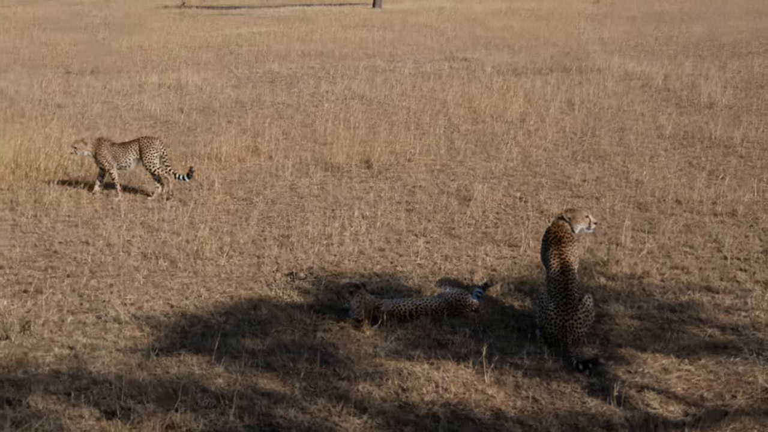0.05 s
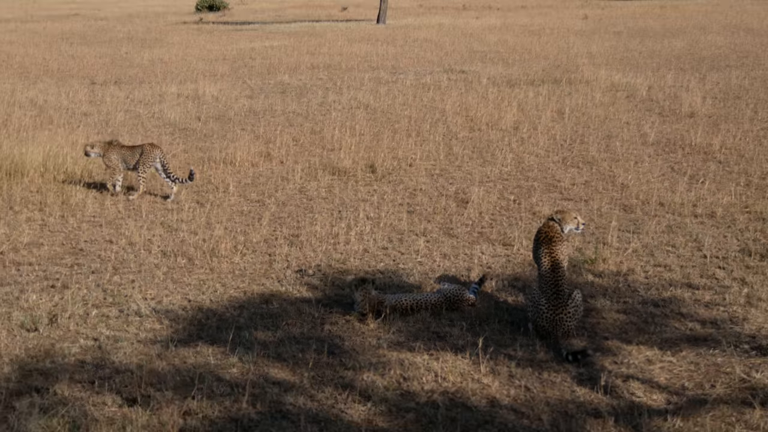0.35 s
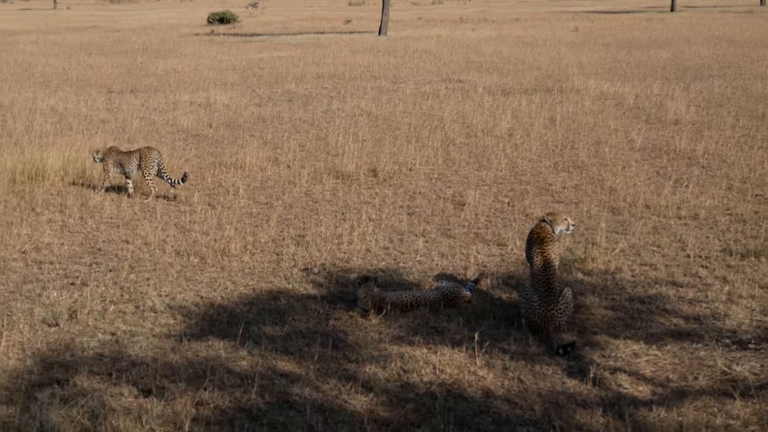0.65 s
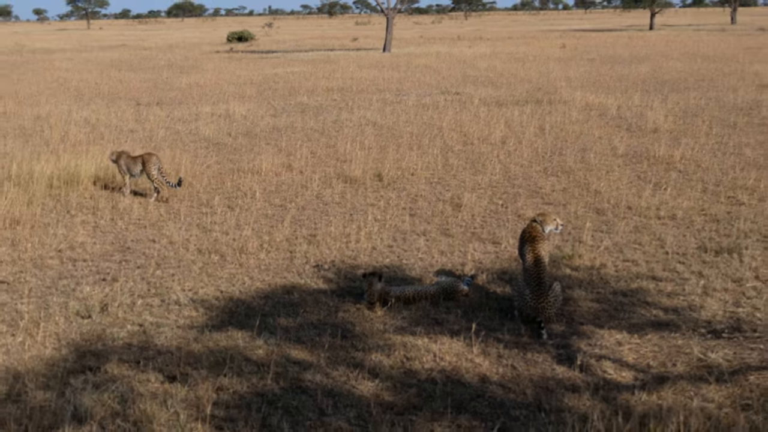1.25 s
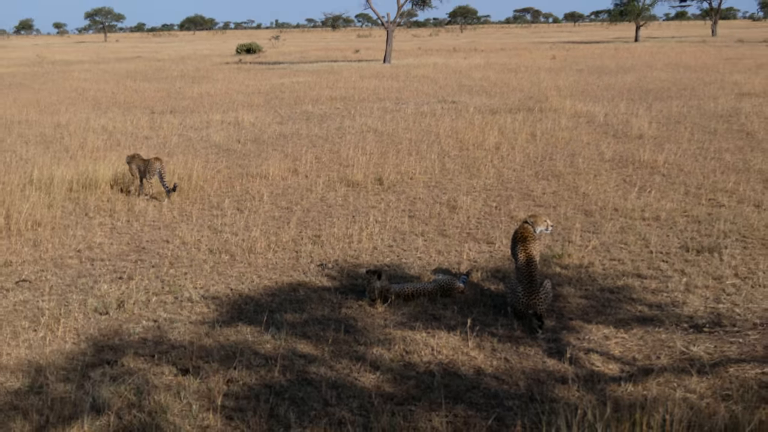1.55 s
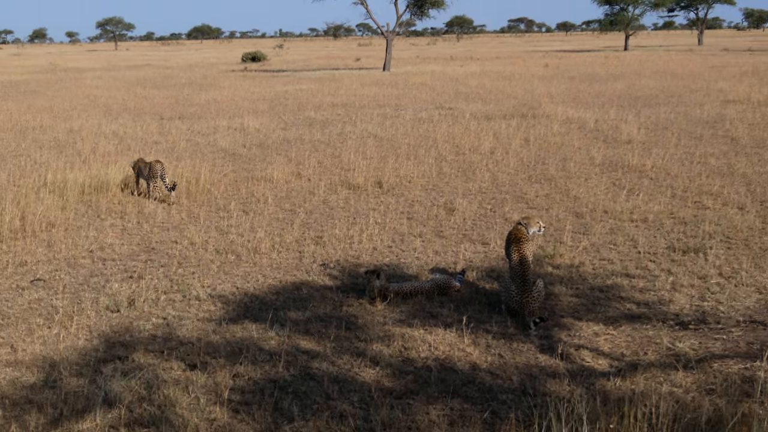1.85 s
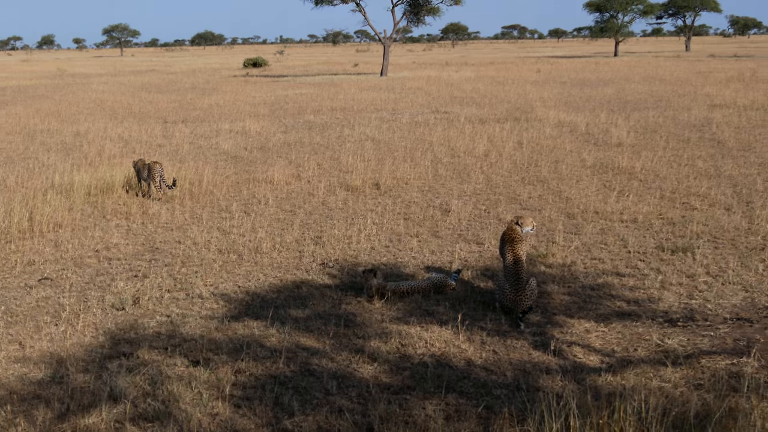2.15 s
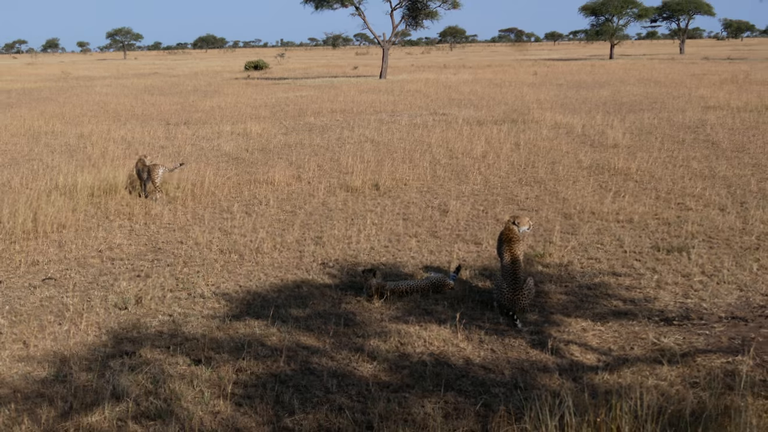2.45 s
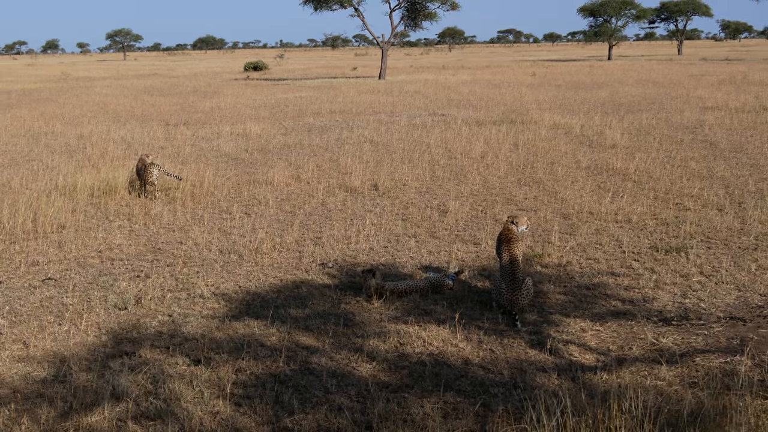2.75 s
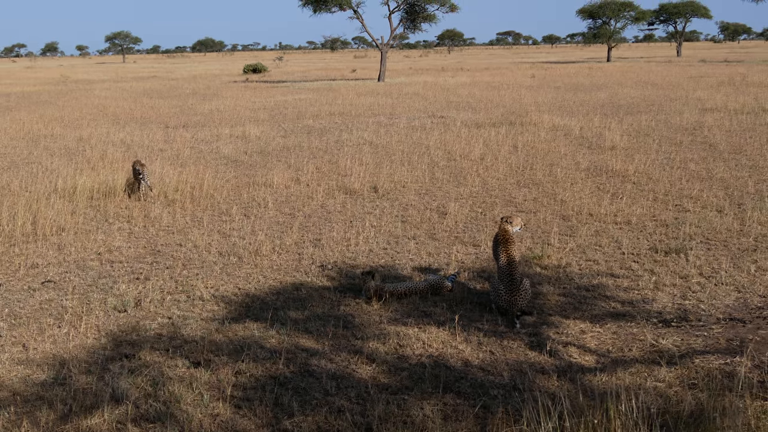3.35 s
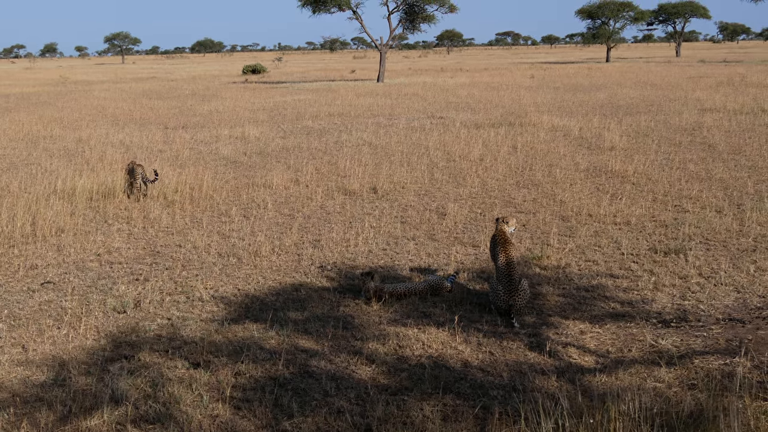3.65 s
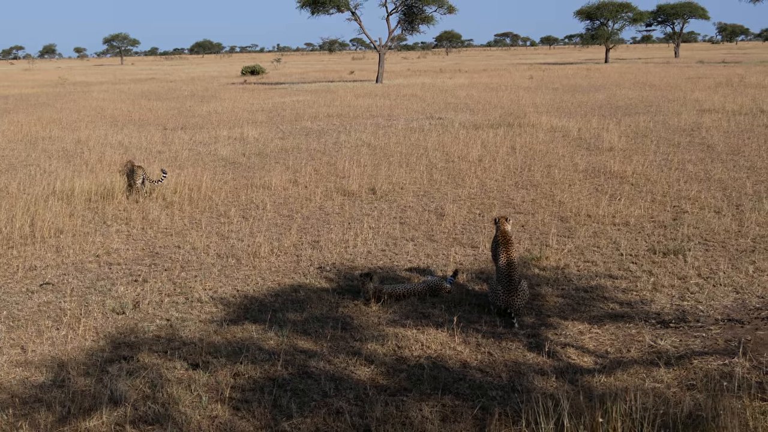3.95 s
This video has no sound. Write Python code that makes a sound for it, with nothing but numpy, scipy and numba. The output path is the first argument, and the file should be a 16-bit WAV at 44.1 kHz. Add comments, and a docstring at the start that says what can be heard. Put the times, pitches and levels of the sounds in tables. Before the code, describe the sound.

Uneven gusts of wind rumble and thump right on the microphone throughout, on an open plain. Behind them dry grass hisses very softly, and far-off birds give a few faint whistles and chips, mostly toward the end.

```python
"""Gusts buffet a stereo microphone on open grassland: eddies thump at its two ports, brighter when
they push harder, and the hardest scrape on the port mesh. Behind them the breeze rushes over the plain,
hisses in dry stalks and sizzles in the seed heads; this background swells slowly, with brief dips
written in where the recorder's gain ducks after the loudest thumps. There are a few faint ticks.
Far off, small birds whistle and chip, their calls scattered by grass and trees."""
import sys
import numpy as np
from scipy import signal
from scipy.fft import rfft, irfft
from scipy.io import wavfile
from scipy.ndimage import uniform_filter1d
from numba import njit

SR = 44100
rng = np.random.default_rng(int(sys.argv[2]) if len(sys.argv) > 2 else 0)


def bounce(signal):
    """Save signal as a 16-bit WAV file at the path given by the first command-line argument."""
    frames = np.transpose(np.atleast_2d(signal))
    limited = np.clip(frames, -1, 1)
    pcm = np.round(limited * 32767).astype(np.int16)
    wavfile.write(sys.argv[1], SR, pcm)


N = 176400
TIME = np.arange(N) / SR


def undb(db):
    """Decibels to gain."""
    return 10 ** (np.asarray(db) / 20)


def unit_rms(x):
    """Scale to rms 1."""
    return x / np.sqrt(np.mean(x ** 2))


def over_time(rows):
    """Join (seconds, value) rows by straight lines."""
    return np.interp(TIME, *np.array(rows).T)


def over_frequency(rows, column=1):
    """One column of a (Hz, ..) table at every frequency bin."""
    rows, bin_hz = np.array(rows), np.arange(N // 2 + 1) * SR / N
    return np.interp(np.log(bin_hz + 1), np.log(rows[:, 0]), rows[:, column])


def butter(x, hz, kind, order=2):
    """Plain low-, high- or band-pass."""
    return signal.sosfilt(signal.butter(order, np.minimum(hz, .45 * SR), kind, fs=SR, output="sos"), x)


def wander(per_s):
    """Smooth random motion with rms 1."""
    return unit_rms(butter(rng.standard_normal(N), per_s / 2, "low"))


@njit
def moving_lowpass(x, edge_hz, damping):
    """State-variable low-pass with a moving edge."""
    low, band_state, low_state = np.empty(len(x)), 0., 0.
    for i in range(len(x)):
        g = np.tan(np.pi * edge_hz[i] / SR)
        band = (band_state + g * (x[i] - low_state)) / (1 + g * (g + damping))
        low[i] = low_state + g * band
        band_state, low_state = 2 * band - band_state, 2 * low[i] - low_state
    return low


def stereo_hiss(spectrum, width):
    """Coloured stereo noise; width is side against mid, and the bass stays central."""
    gain = undb(over_frequency(spectrum))
    mid, side = (unit_rms(irfft(rfft(rng.standard_normal(N)) * gain, N)) for _ in range(2))
    side = butter(side, 250, "high")
    return mid + width * np.array([side, -side])


# Wind pressure right at the microphone. Each row: time in seconds, relative level in dB.
GUST_LEVEL = [(0.0, -45.5), (0.12, -40), (0.145, -53.5), (0.17, -35), (0.182, -45), (0.2, -26.5),
              (0.232, -47.5), (0.25, -33.5), (0.36, -32), (0.405, -36), (0.425, -52), (0.48, -62.5),
              (0.495, -55.5), (0.505, -33.5), (0.525, -51), (0.6, -55), (0.63, -42.5), (0.665, -46),
              (0.69, -29), (0.735, -21), (0.748, -29.5), (0.758, -48.5), (0.78, -35.5), (0.92, -30.5),
              (0.99, -34.5), (1.012, -20), (1.055, -22), (1.072, -33.5), (1.09, -24), (1.14, -30.5),
              (1.16, -35), (1.23, -42), (1.27, -27.5), (1.32, -36.5), (1.4, -37), (1.44, -55.5),
              (1.46, -38.5), (1.478, -45.5), (1.5, -28), (1.52, -42.5), (1.535, -29.5), (1.57, -50),
              (1.63, -38.5), (1.675, -31.5), (1.7, -54), (1.73, -32), (1.77, -26.5), (1.86, -25),
              (1.92, -23), (1.945, -33.5), (2.06, -28), (2.095, -36.5), (2.14, -28.5), (2.22, -22.5),
              (2.275, -34.5), (2.34, -24), (2.355, -48), (2.372, -46), (2.405, -36), (2.425, -40),
              (2.45, -26), (2.51, -28.5), (2.57, -22.5), (2.6, -50), (2.63, -30.5), (2.662, -38.5),
              (2.686, -28), (2.705, -33), (2.73, -31.5), (2.75, -48), (2.79, -47.5), (2.88, -34.5),
              (2.9, -49.5), (2.935, -41.5), (2.96, -26.5), (3.0, -27.5), (3.015, -52), (3.04, -45.5),
              (3.09, -36), (3.105, -28.5), (3.21, -28.5), (3.24, -38), (3.275, -29.5), (3.3, -36),
              (3.36, -38.5), (3.41, -45.5), (3.43, -28.5), (3.46, -50), (3.565, -38), (3.585, -33.5),
              (3.62, -35.5), (3.68, -37), (3.715, -25.5), (3.745, -36.5), (3.82, -20), (3.85, -38),
              (3.93, -37), (4.0, -32)]
# Top of the rumble for a gust at STRONG_GUST_DB. Each row: time in seconds, upper edge in Hz.
RUMBLE_EDGE = [(0, 378), (.35, 396), (.73, 539), (.86, 437), (1.05, 572), (1.3, 433), (1.85, 392),
               (2.2, 487), (2.5, 462), (2.7, 536), (2.96, 515), (3.4, 388), (3.65, 411), (3.82, 509),
               (4, 481)]
# Single large eddies that thump on the ports.
# Each row: centre in seconds, relative level in dB, width in seconds, upper edge in Hz.
LARGE_EDDIES = [(0.204, -26, 0.0076, 371), (0.359, -26, 0.0053, 433), (0.503, -34, 0.0027, 286.4),
                (0.686, -31, 0.0045, 676), (0.721, -22, 0.0044, 532), (0.734, -20, 0.0055, 568),
                (0.774, -27.5, 0.0035, 563), (0.829, -26.5, 0.0058, 474), (0.9, -28.5, 0.0042, 396.5),
                (1.025, -20.5, 0.0078, 630), (1.049, -22, 0.0036, 590), (1.084, -18, 0.0034, 560),
                (1.1, -27, 0.0046, 752), (1.132, -24, .004, 428), (1.308, -32, .004, 423),
                (1.496, -22, 0.0062, 485), (1.599, -30.5, .003, 520), (1.627, -23, .003, 470),
                (1.641, -32, .003, 584), (1.666, -32.5, .004, 430), (1.788, -23, .004, 482),
                (1.819, -21.5, 0.0024, 589), (1.844, -21.5, 0.0043, 592), (1.918, -24, 0.0096, 513),
                (2.024, -24.5, 0.0032, 481), (2.058, -25.5, 0.0047, 517), (2.162, -18.5, 0.0045, 614),
                (2.197, -18.5, .005, 581), (2.216, -15.5, .003, 500), (2.245, -24.5, 0.011, 650),
                (2.295, -21.5, 0.0034, 547), (2.386, -19.5, 0.0032, 291.4), (2.492, -27, .003, 441),
                (2.558, -24, .006, 568), (2.689, -18, 0.0036, 600), (2.854, -31, 0.0043, 338),
                (2.964, -23.5, 0.0036, 738), (3.13, -29.5, 0.0043, 508), (3.387, -29.5, 0.0058, 292),
                (3.425, -29, .005, 297.4), (3.579, -27, 0.0044, 342.6), (3.766, -22.5, 0.0048, 365),
                (3.804, -20, .004, 563), (3.818, -18.5, 0.0054, 531), (3.92, -32.5, .003, 672)]
STRONG_GUST_DB, OCTAVES_PER_DB = -23.5, 0.0454


def gusts():
    """Pressure (dB) and rumble edge (Hz): ragged gusts, brighter when harder, with large eddies on top."""
    puffs_db = 2.4 * np.minimum(wander(55), .5)
    gust_db = over_time(GUST_LEVEL) + puffs_db
    power = undb(gust_db) ** 2
    edge_hz = over_time(RUMBLE_EDGE) * 2 ** (OCTAVES_PER_DB * (gust_db - STRONG_GUST_DB))
    for centre, db, width, hz in LARGE_EDDIES:
        bump = np.exp(-.5 * ((TIME - centre) / width) ** 2)
        power = np.maximum(power, undb(db) ** 2 * bump)
        edge_hz += (hz - edge_hz) * np.sqrt(bump)
    return 10 * np.log10(power), edge_hz


def small_eddies(edge_hz, flutter_db=5, flutter_octaves=.17, damping=1.637):
    """Turbulent pressure in short bursts; each burst lifts the upper edge of the rumble a little."""
    flutter = wander(143)
    edge_hz = np.clip(edge_hz * 2 ** (flutter_octaves * flutter), 200, 850)
    rumble = butter(rng.standard_normal(N), 180, "low", order=1) * undb(flutter_db * flutter)
    for _ in range(2):
        rumble = moving_lowpass(rumble, edge_hz, damping)
    return butter(rumble, 138.7, "high")


# The microphone's left port against its right.
# Each row: frequency in Hz, level in dB, phase lead in radians.
LEFT_PORT = [(20, -1.5, 0.5), (64, -3.5, -0.9), (151, 1.4, 0.48), (260, -2, 0.6), (296, -4, 0.7),
             (400, -10, 1.01), (547, -14.5, 1.5), (850, -11.5, 4), (1390, -4.5, 0.2)]


def buffeting(trim_db=1, right_only_db=-19, screen_hz=1190):
    """Both ports feel the same eddies; the left is sheltered in the middle range and out of step."""
    gust_db, edge_hz = gusts()
    left_response = undb(over_frequency(LEFT_PORT)) * np.exp(1j * over_frequency(LEFT_PORT, column=2))
    swirl = small_eddies(edge_hz)
    mid = irfft(rfft(swirl) * (1 + left_response) / 2, N)
    mid_power = uniform_filter1d(uniform_filter1d(mid ** 2, size=560), size=560)
    push = undb(gust_db + trim_db) / np.sqrt(mid_power + 1e-12)  # eddies carry the gust's pressure
    shared = butter(swirl * push, 59.2, "high", order=3)
    left = irfft(rfft(shared) * left_response, N)
    right_only = undb(right_only_db) * butter(small_eddies(edge_hz) * push, 250, "high")
    return butter(np.array([left, shared + right_only]), screen_hz, "low", order=4)


def mesh_rasp(port_pressure):
    """The hardest eddies scrape on the port mesh: noise that grows with the pressure squared."""
    scrape = unit_rms(butter(rng.standard_normal((2, N)), [1180, 3420], "band", order=3))
    return undb(-43) * scrape * port_pressure ** 2


# The breeze out on the plain. Each row: frequency in Hz, relative noise density in dB.
BREEZE_SPECTRUM = [(40, -8.5), (120, 2), (300, -4.5), (550, -11), (900, -14), (1300, -21), (1800, -26.5),
                   (2800, -36), (4500, -47), (8000, -63.5)]
# Level of the rush: slow swells, and brief dips where the recorder's gain ducks after the loudest thumps.
# Each row: time in seconds, level in dB.
RUSH_LEVEL = [(0, -57.5), (.6, -55), (1.3, -56.5), (1.7, -54.5), (2.1, -49), (2.3, -52.5), (2.9, -52),
              (3.3, -51.5), (3.68, -47), (3.8, -49), (3.86, -56.5), (4, -43.5)]


def breeze(sway_db=.9):
    """Air moving over open ground makes a low, gently swaying rush."""
    return stereo_hiss(BREEZE_SPECTRUM, width=.65) * undb(over_time(RUSH_LEVEL) + sway_db * wander(10))


# Dry grass around the microphone. Each row: frequency in Hz, relative noise density in dB.
STALK_SPECTRUM = [(1500, -5.5), (3000, -1.5), (4000, -2.5), (5200, -7), (7300, -11.5), (7950, -19),
                  (8600, -13.5), (10200, -11), (11500, -15), (12800, -22.5), (15000, -15.5)]
# Level of the hiss: slow swells, and brief dips where the recorder's gain ducks.
# Each row: time in seconds, level in dB before the trim.
HISS_LEVEL = [(0.0, -90), (0.31, -88), (0.65, -88), (0.68, -85), (0.74, -88), (1.15, -88.5), (1.3, -87.5),
              (1.76, -86), (1.87, -89), (2.2, -87), (2.24, -92), (2.44, -86.5), (2.69, -89), (3.55, -85.5),
              (3.8, -85), (3.835, -87.5), (3.95, -83.5)]


def dry_stalks(trim_db=8, flicker_db=1.2):
    """The breeze draws a thin, flickering hiss from the stalks."""
    hiss = stereo_hiss(STALK_SPECTRUM, width=.6)
    return hiss * undb(over_time(HISS_LEVEL) + trim_db + flicker_db * wander(60))


# Seed heads at the top of the grass. Each row: frequency in Hz, relative noise density in dB.
SEED_SPECTRUM = [(7900, -23), (8700, -5.5), (10200, 0.5), (11400, -5.5), (12800, -24), (15000, -32)]
# Level of the sizzle: slow swells, and brief dips where the recorder's gain ducks.
# Each row: time in seconds, level in dB.
SEED_LEVEL = [(0, -93.5), (.35, -91.5), (.55, -92.5), (.68, -90), (.76, -99), (.95, -89.5), (1.15, -100.5),
              (1.55, -91.5), (1.77, -89), (1.85, -100), (2.14, -91.5), (2.24, -104), (2.45, -97.5),
              (2.72, -96.5), (3.05, -91), (3.4, -86.5), (3.65, -87), (3.8, -90), (3.835, -102),
              (3.95, -98.5)]


def seed_heads(flicker_db=1.2):
    """The seed heads sizzle in the breeze, in a band around 10 kHz."""
    return stereo_hiss(SEED_SPECTRUM, width=.6) * undb(over_time(SEED_LEVEL) + flicker_db * wander(80))


# Faint ticks, dead centre. Each row: start in seconds, level in dB, lowest and highest frequency in Hz.
FAINT_TICKS = [(0.219, -62, 400, 3400), (.689, -77, 7000, 12000), (2.619, -74, 2000, 6000),
               (3.009, -63.5, 1000, 4400)]


def ticks(decay_s=0.0036):
    """Tiny dry clicks that die within milliseconds."""
    clicks = np.zeros(N)
    for start, db, low, high in FAINT_TICKS:
        crack = rng.standard_normal(N) * (TIME >= start) * np.exp(-np.abs(TIME - start) / decay_s)
        band_makeup = np.sqrt(SR / 2 / (high - low))
        clicks += undb(db) * band_makeup * butter(crack, [low, high], "band", order=3)
    return clicks


# Chips from far off. Each row: start in seconds, length in seconds, pitch in Hz, relative level in dB.
BIRD_CHIPS = [(1.287, 0.027, 3080, -73), (1.332, 0.031, 3000, -75), (1.388, .025, 2900, -74.5),
              (3.648, 0.027, 3000, -68), (3.69, 0.041, 3000, -63.5), (3.742, 0.026, 3030, -58.5),
              (3.799, 0.025, 2985, -59), (3.86, 0.031, 3380, -63.5)]


def bird_chips(rasp_per_s=750):
    """Short calls that rasp as the tone's strength and phase waver quickly."""
    calls = np.zeros(N)
    rasp_sin, rasp_cos = wander(rasp_per_s), wander(rasp_per_s)
    for start, length, hz, db in BIRD_CHIPS:
        progress = np.clip((TIME - start) / length, 0, 1)
        phase = 2 * np.pi * hz * TIME
        rough_tone = rasp_sin * np.sin(phase) + rasp_cos * np.cos(phase)
        calls += undb(db) * np.sin(np.pi * progress) ** 2 * rough_tone
    return calls


# Whistles from far off.
# Each row: start in seconds, length in seconds, first and last pitch in Hz, relative level in dB.
BIRD_WHISTLES = [(1.402, 0.037, 4650, 3570, -82), (1.505, 0.029, 4900, 3830, -79),
                 (2.443, .03, 4400, 3640, -78.5), (2.593, 0.058, 4810, 3650, -77),
                 (3.312, .04, 4500, 3340, -75), (3.532, 0.042, 4820, 3370, -65.5),
                 (3.644, .04, 4850, 4450, -76.5), (3.683, 0.05, 4400, 3100, -68)]


def bird_whistles(flicker_db=3):
    """Thin, flickering tones that fall ever faster."""
    calls = np.zeros(N)
    for start, length, high, low, db in BIRD_WHISTLES:
        progress = np.clip((TIME - start) / length, 0, 1)
        hz = high + (low - high) * progress ** 1.5
        calls += undb(db) * np.sin(np.pi * progress ** 0.83) * np.sin(2 * np.pi * np.cumsum(hz) / SR)
    return calls * undb(flicker_db * wander(300))


def far_off(calls, scatter_db=-5, decay_s=.02, left_over_right_db=2.5):
    """Grass and trees scatter calls from a little to the left into a short tail, one for each port."""
    t = TIME[:SR // 5]
    tail = rng.standard_normal((2, len(t))) * np.exp(-t / decay_s)
    tail /= np.sqrt(np.sum(tail ** 2, axis=1, keepdims=True))
    scattered = undb(scatter_db) * signal.fftconvolve(calls[None], tail, axes=1)[:, :N]
    pan = undb(left_over_right_db * np.array([[.5], [-.5]]))
    return pan * (calls + scattered) / np.hypot(1, undb(scatter_db))


def scene():
    """Wind right on the microphone, the quiet plain behind it, birds in the distance."""
    ports = buffeting()
    close_wind = ports + mesh_rasp(ports)
    grassland = breeze() + dry_stalks() + seed_heads()
    return close_wind + grassland + ticks() + far_off(bird_chips() + bird_whistles())


def record(dry):
    """The recorder cuts the top steeply above 15.3 kHz."""
    return signal.sosfilt(signal.ellip(8, .2, 70, 15300, fs=SR, output="sos"), dry)


dry = scene()
out = record(dry)
bounce(out)
```